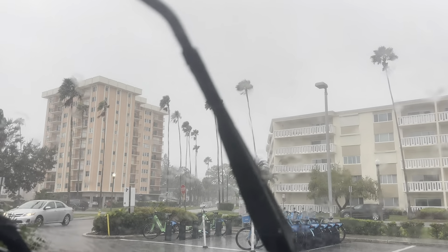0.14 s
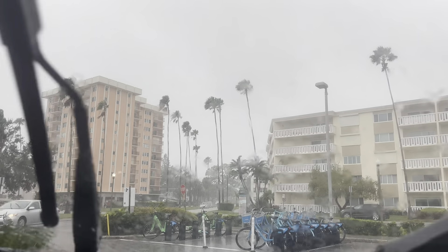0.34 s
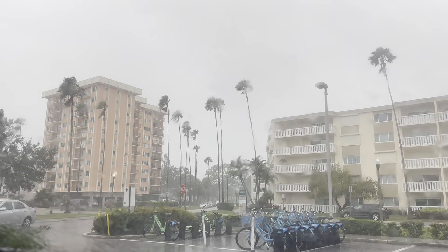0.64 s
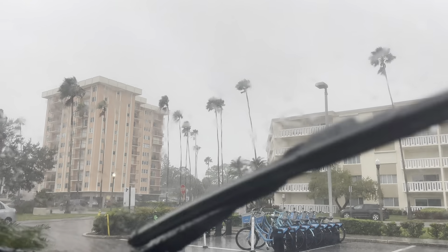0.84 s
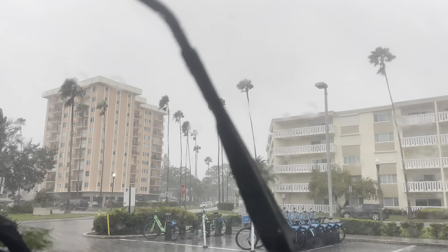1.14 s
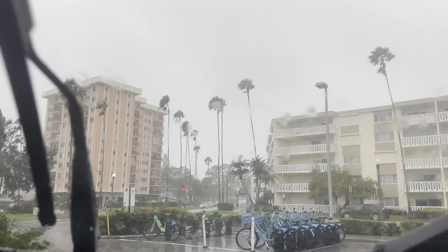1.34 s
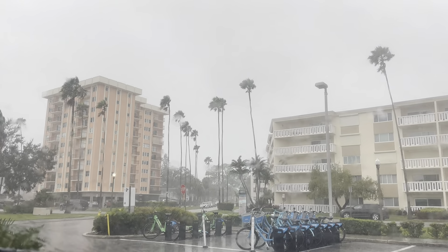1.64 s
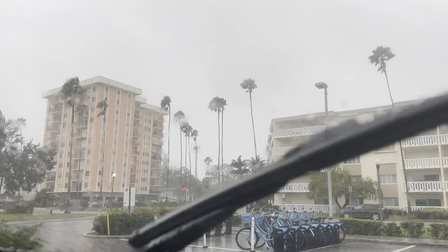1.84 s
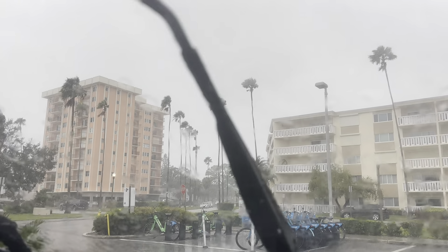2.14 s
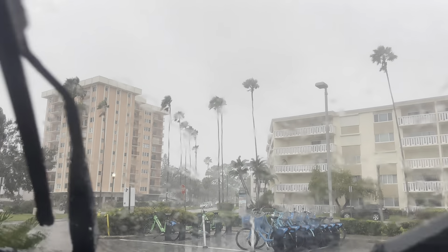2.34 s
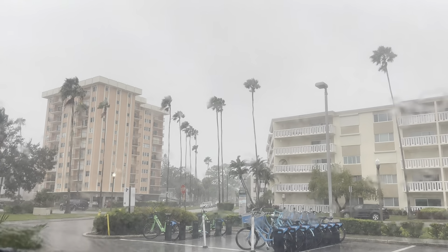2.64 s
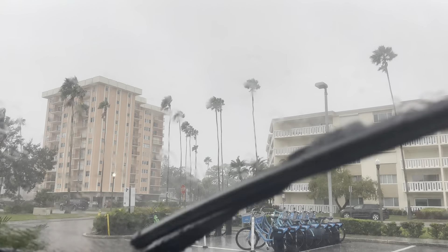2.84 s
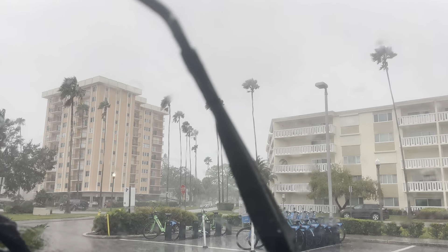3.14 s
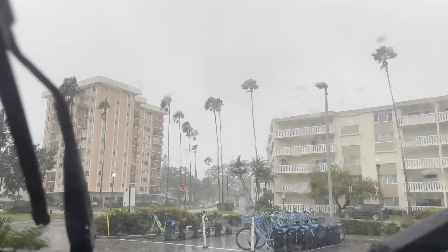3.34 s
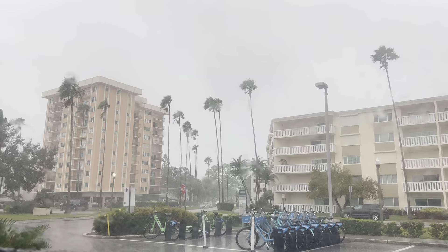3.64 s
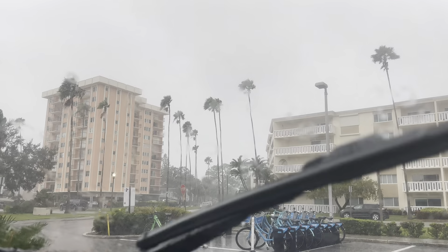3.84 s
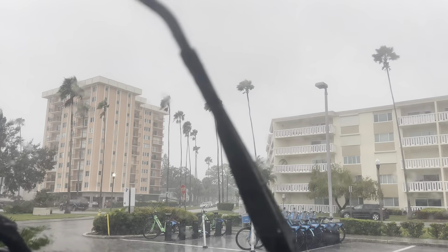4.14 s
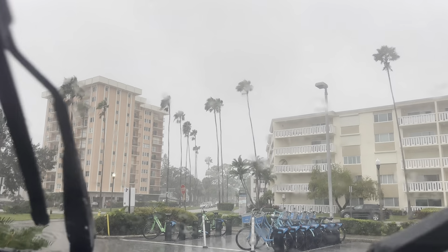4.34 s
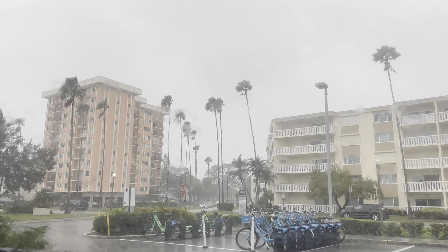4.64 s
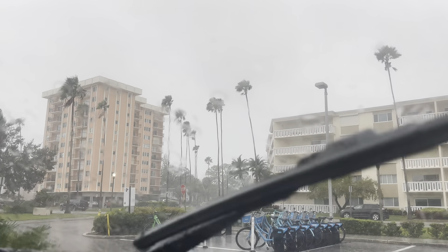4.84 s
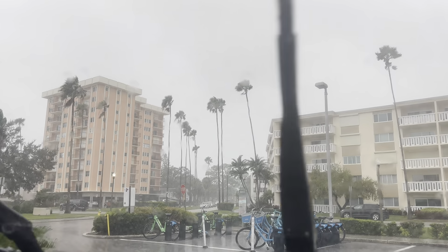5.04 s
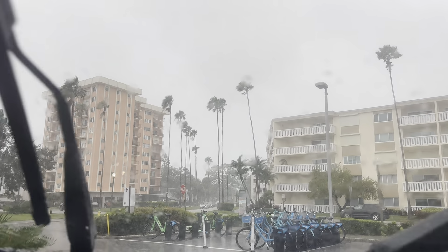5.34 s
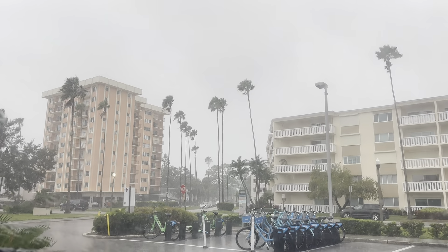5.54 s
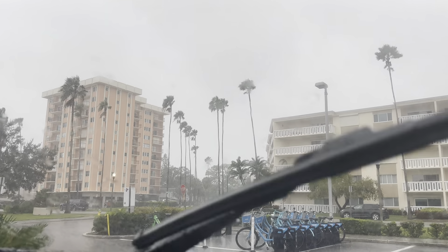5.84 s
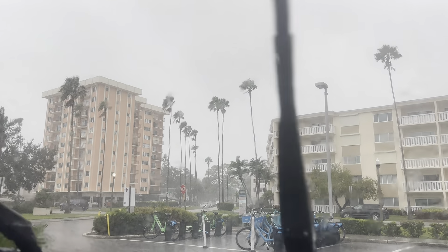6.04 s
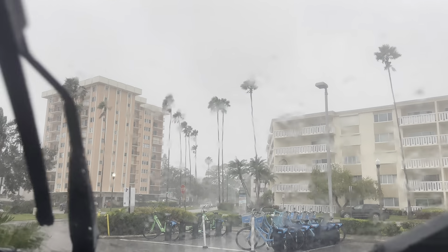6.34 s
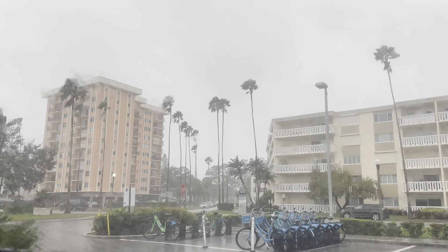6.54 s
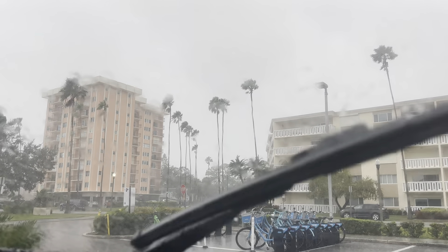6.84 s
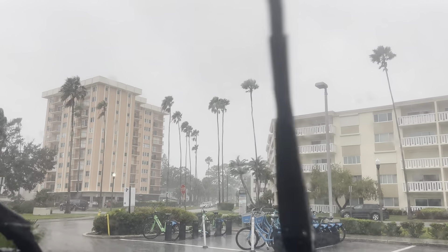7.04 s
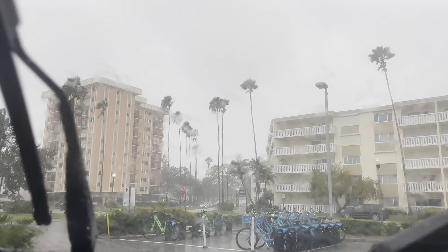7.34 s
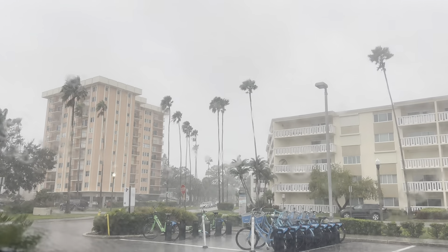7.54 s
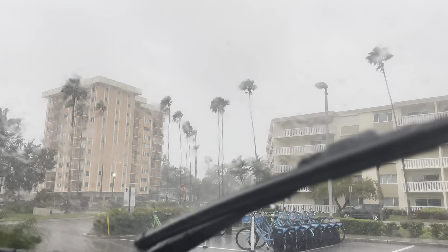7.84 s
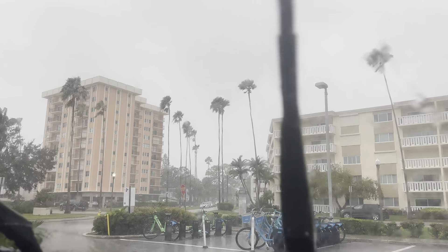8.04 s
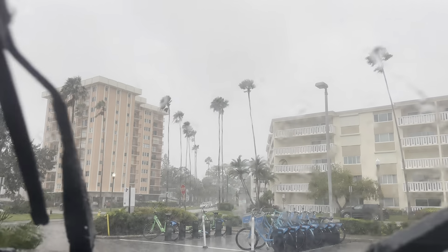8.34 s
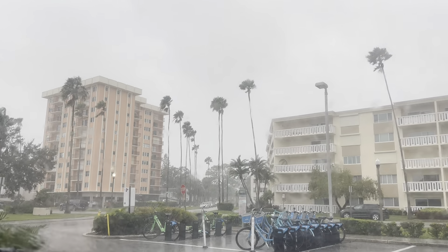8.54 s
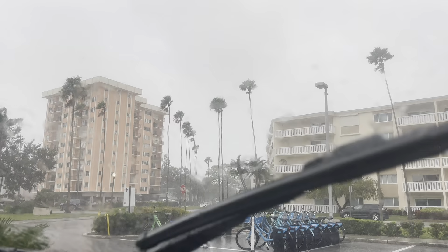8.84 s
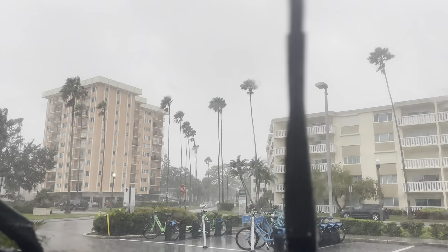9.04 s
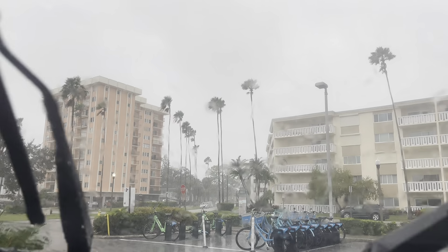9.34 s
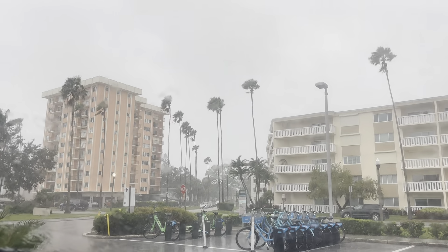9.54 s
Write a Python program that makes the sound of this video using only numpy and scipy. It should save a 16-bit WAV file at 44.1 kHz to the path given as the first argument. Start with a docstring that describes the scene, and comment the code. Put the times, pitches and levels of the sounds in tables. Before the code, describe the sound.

Windscreen wipers thump and judder about once a second inside a parked car while gusty rain hisses on roof and glass over a low body rumble.

```python
"""Windscreen wipers knock at each turn of their sweep, about once a second there and back, in a parked car in a storm.
Each knock rings the low modes of the car body; juddering blades add quick runs of small knocks.
Filtered noise keeps the body rumbling throughout, with a wavering low boom strongest at the turns and a few rough scrapes.
Gusts drive rain on roof and glass: a grainy hiss made of noise splashes, with a few big drops ticking out of it.
A phone near the windscreen hears it all through a left and a right port."""
import sys
import numpy as np
from scipy import signal
from scipy.fft import rfft, irfft, next_fast_len
from scipy.io import wavfile
from scipy.ndimage import uniform_filter1d, minimum_filter1d

SR = 44100
rng = np.random.default_rng(int(sys.argv[2]) if len(sys.argv) > 2 else 0)


def dump(signal):
    """Clip the signal to [-1, 1] and save it as 16-bit WAV at the path in sys.argv[1]."""
    limited = np.clip(np.atleast_2d(signal).T, -1, 1)
    pcm = np.round(limited * 32767).astype(np.int16)
    wavfile.write(sys.argv[1], SR, pcm)


N = 427329
SIZE = next_fast_len(N)  # transform length [samples]
HZ = np.maximum(np.arange(SIZE // 2 + 1) * SR / SIZE, 1)  # pitch of each bin; at least 1 for the logarithm
SWEEP_S, HARD_TURN_S = 1.0005, 0.924  # one sweep there and back; time of the first whole hard turn

# ways the car body rings: (pitch [Hz], relative knock level [dB], relative rumble level [dB],
# time to fade by 60 dB [s], relative judder level [dB])
BODY_MODES = [(59.47, -13.5, -10, 0.13, -22), (99.04, -8.5, 2.5, 0.22, -18.5),
              (122.45, -6.5, -1.5, 0.19, -9), (167.8, -0.5, -15.5, 0.14, -3.5), (199.2, -4, -9.5, 0.11, -9),
              (235.2, -5.5, -10.5, 0.083, -8), (284.4, -9, -24, 0.078, -10.5), (349.5, -2, -24, 0.063, -3),
              (384, 1.5, -25, 0.15, -3), (440.5, -3.5, -27, 0.055, -6), (510, 0.5, -29.5, .03, -10)]


def undb(db):
    """Turn a level in dB into a gain."""
    return 10 ** (np.asarray(db) / 20)


def unit(x):
    """Scale a sound to rms 1."""
    return x / np.sqrt(np.mean(x ** 2))


def in_time(table):
    """Draw each column of a table as a curve over time, sample by sample."""
    s, *columns = np.transpose(table)
    return [np.interp(np.arange(N) / SR, s, column) for column in columns]


def each_sweep(table):
    """Draw each column as a curve that repeats with the wipers."""
    s, *columns = np.transpose(table)
    since_turn = np.arange(N) / SR - HARD_TURN_S
    return [np.interp(since_turn, s, column, period=SWEEP_S) for column in columns]


def in_pitch(table):
    """Draw each column as a curve over pitch, bin by bin."""
    hz, *columns = np.transpose(table)
    return [np.interp(np.log(HZ), np.log(hz), column) for column in columns]


def colour(x, gain):
    """Filter a sound by a complex gain for each bin."""
    return irfft(rfft(x, SIZE) * gain, SIZE)[:N]


def ring(x, hz, t60):
    """Let one mode ring at hz whenever x pushes it, fading by 60 dB in t60 seconds."""
    pole = np.exp(2j * np.pi * hz / SR - np.log(1000) / (t60 * SR))
    return signal.lfilter([1], [1, -pole], x).imag


def spikes(s, size):
    """Place single-sample pushes at the given times."""
    out = np.zeros(N)
    at = np.clip((s * SR).astype(int), 0, N - 1)
    np.add.at(out, at, size)
    return out


def walk(rate):
    """Wander at random: levels held 1 / rate seconds, smoothed twice, with rms 1."""
    hold = int(SR / rate)
    steps = np.repeat(rng.standard_normal(N // hold + 1), hold)
    smooth = uniform_filter1d(uniform_filter1d(steps, hold), hold)
    return unit(smooth[:N])


def patter(per_s=900, spread_db=3.5, wash_db=1.5, biggest_db=20, decay_s=0.002):
    """Dense drops of uneven size splash as short noise bursts over the smooth wash of the distant ones."""
    at, size = rng.random((30000, 2)).T
    heard = np.arange(len(at)) < per_s * N / SR
    size_db = np.minimum(-spread_db * np.log(size), biggest_db)
    hits = spikes(at * N / SR, heard * undb(size_db))
    envelope = signal.lfilter([1], [1, -np.exp(-1 / (decay_s * SR))], hits)
    splash = envelope * rng.standard_normal(N)
    return unit(splash) + undb(wash_db) * rng.standard_normal(N)


def gusty(sheets, drum_share=0.91, treble_share=1.05):
    """Half-octave bands follow the gust; flurries of drops flicker through all of them, the treble most."""
    # rain driven by gusts: (time [s], relative level [dB])
    gust_levels = [(0.06, -48), (0.12, -54), (0.27, -55.5), (0.41, -54.5), (0.45, -50), (0.68, -47.5),
                   (0.79, -48), (1.12, -54.5), (1.33, -59.5), (1.5, -55), (1.64, -55), (1.84, -53),
                   (1.9, -48.5), (2.12, -46.5), (2.3, -47.5), (2.38, -49), (3.15, -53), (3.9, -54),
                   (4.37, -56), (4.45, -52), (4.85, -53), (4.95, -53.5), (5.45, -56.5), (5.65, -54),
                   (5.93, -49), (6.3, -50.5), (6.41, -48), (6.5, -50.5), (6.75, -51), (6.83, -56),
                   (6.99, -54), (7.05, -51.5), (7.17, -53), (7.37, -49), (7.79, -50), (7.85, -52.5),
                   (8.41, -54), (8.5, -52), (8.73, -50), (8.79, -52.5), (9.25, -52), (9.45, -49.5),
                   (9.63, -52.5)]
    level_db, = in_time(gust_levels)
    swing_db = level_db - level_db.mean()
    spectra = rfft(sheets, SIZE)
    flurry = walk(35)
    out = 0
    for octave in np.arange(0, 6.5, .5):  # octaves above 250 Hz
        band = np.clip(1 - 2 * np.abs(np.log2(HZ / 250) - octave), 0, 1)
        low = np.clip(3.5 - octave, 0, 1)  # drumming, fading out from 1.4 to 2.8 kHz
        high = np.clip(octave - 4.0, 0, 1)  # treble, coming in from 4 to 8 kHz
        extra_share = low * (drum_share - 1) + high * (treble_share - 1)
        flicker_db = (.8 - .5 * low) * flurry + 1.12 * walk(12)
        db = level_db + extra_share * swing_db + flicker_db
        out = out + undb(db) * irfft(spectra * band, SIZE)[:, :N]
    return out


def rain():
    """Both ports share one part of the rain, shifted in phase; the right has its own part besides."""
    # tone of the rain: (pitch [Hz], relative left level [dB], relative right level [dB])
    rain_tone = [(251, 4, 2.5), (547, 1.75, -0.5), (788, 3.5, 1), (912, -10, -6), (1130, -3.5, -0.5),
                 (1215, -1, 4), (1308, 2.5, 5.5), (1412, 0, 3), (1590, -0.5, -0.5), (2190, -15.5, -15.5),
                 (2480, -9.5, -8), (2790, -13, -15.5), (3360, -11.5, -16.5), (3820, -15.5, -19.5),
                 (4180, -14, -19), (4730, -14.5, -18), (5550, -20, -21), (6600, -22, -23),
                 (7440, -19.5, -22.5), (7900, -28, -25.5), (8100, -26.5, -19.5), (8430, -37, -27.5),
                 (9650, -35, -30.5), (10400, -39.5, -39), (10600, -48, -42.5), (12300, -50, -55.5),
                 (15700, -47.5, -54.5)]
    # how alike the ports hear it: (pitch [Hz], likeness [0-1], phase of the right [rad])
    port_likeness = [(400, .6, 1.8), (1300, .65, 1.3), (1500, .75, 3.1), (1800, .55, 4.6), (2300, .55, 7.5),
                     (2500, .7, 6.7), (2950, .05, 6), (3550, .6, 6), (3950, .1, 5.5), (4300, .3, 8),
                     (5200, .3, 11.5), (6000, .5, 12.8), (6500, .15, 11.5), (8000, .4, 7.9), (8500, .05, 6),
                     (10500, .8, 9.4)]
    shared, own = gusty(np.array([unit(patter()), unit(patter())]))
    left_db, right_db = in_pitch(rain_tone)
    alike, phase = in_pitch(port_likeness)
    alike = np.clip(alike, 0, 1)
    right = colour(shared, alike * np.exp(1j * phase)) + colour(own, np.sqrt(1 - alike ** 2))
    return undb(24) * np.array([colour(shared, undb(left_db)), colour(right, undb(right_db))])


def drops(late_s=0.0007, tick_s=0.002):
    """Each big drop gives a short noise tick, some duller, and a brief ring of the pane, louder on the left."""
    # big single drops on the glass: (time [s], relative peak level [dB], tick fades above [Hz])
    big_drops = [(0.7794, -31.5, 8500), (1.3844, -39, 6500), (1.4117, -46, 3500), (1.4297, -41, 4000),
                 (2.5373, -34, 7500), (3.4332, -40.5, 3000), (5.2974, -41, 4500), (6.399, -40, 5000),
                 (6.8099, -41, 5000), (8.667, -43, 4500)]
    # the pane under a drop, lower tones later:
    # (pitch [Hz], level against the tick [dB], time to fade by 60 dB [s], delay [s])
    pane_modes = [(1290, -4.5, .04, 0.00301), (2460, -6.5, 0.011, .0015), (5900, -6.5, 0.01, .0005)]
    length = 400  # samples in a tick
    ticks = np.zeros(N + length)
    fade = np.exp(-np.arange(length) / SR / tick_s)
    glass = signal.butter(3, 2200, "high", fs=SR, output="sos")
    for (s, db, dull_hz), burst in zip(big_drops, rng.standard_normal((len(big_drops), length))):
        dull = signal.butter(4, dull_hz, fs=SR, output="sos")
        tick = signal.sosfilt(np.vstack([glass, dull]), burst * fade)
        at = int((s + late_s) * SR)
        ticks[at:at + length] += undb(db) * tick / np.abs(tick).max()
    s, peak_db, _ = np.transpose(big_drops)
    pane = 0
    for hz, db, t60, delay in pane_modes:
        pane = pane + ring(spikes(s + late_s + delay, undb(peak_db + db)), hz, t60)
    return undb([[1.5], [-.5]]) * (ticks[:N] + pane)  # left, right


def scrapes(low_hz=710, high_hz=810, rough_db=1.5):
    """A narrow band of rough noise, a rasp, swells and fades."""
    # brief mid-range rasps: (middle [s], length [s], level [dB])
    rasps = [(3.98, .04, -42), (4.535, .03, -42), (4.797, .035, -41.5), (8.87, 0.047, -44)]
    t = np.arange(N) / SR
    swell = sum(undb(db) * np.exp(-((t - s) / (length / 2)) ** 2) for s, length, db in rasps)
    rough = rng.standard_normal((2, N)) * undb(rough_db * walk(90))
    narrow = signal.butter(2, [low_hz, high_hz], "band", fs=SR, output="sos")
    return swell * unit(signal.sosfilt(narrow, rough))


def rumble():
    """Unsteady shaking keeps the body modes sounding; the lowest is a wavering boom that repeats each sweep."""
    # the boom through every sweep: (time after the hard turn [s], relative level [dB])
    boom_levels = [(.025, -21.5), (.09, -22), (.17, -36), (.26, -35), (.36, -42), (.5, -35), (.63, -23),
                   (.7, -27.5), (.78, -38), (.9, -33), (.975, -31.5)]
    # wind and wipers shaking the body: (time [s], relative rumble level [dB])
    shaking_levels = [(0.0, -17), (0.08, -26), (0.21, -20.5), (0.24, -31), (0.51, -25.5), (0.57, -18.5),
                      (0.78, -29), (0.89, -20.5), (1.53, -31), (1.59, -24.5), (1.81, -30.5), (1.86, -20),
                      (2.75, -26.5), (2.89, -20.5), (3.13, -25), (3.21, -19.5), (3.4, -34.5), (3.45, -17.5),
                      (3.48, -28.5), (3.56, -19), (3.7, -31.5), (3.91, -20.5), (4.32, -30), (4.53, -18.5),
                      (4.56, -27), (4.75, -22.5), (5.48, -28), (5.56, -17.5), (5.61, -29.5), (6.07, -21),
                      (6.31, -28.5), (6.61, -21), (6.67, -38), (6.72, -26), (7.04, -21.5), (7.1, -30),
                      (7.26, -23.5), (7.5, -26), (7.55, -18), (7.72, -29), (7.96, -22), (8.36, -31.5),
                      (8.45, -20.5), (8.47, -32.5), (8.53, -24), (8.83, -28), (8.85, -17.5), (8.93, -31),
                      (8.98, -22), (9.17, -33.5), (9.23, -16.5), (9.28, -36), (9.31, -22.5), (9.45, -31.5),
                      (9.55, -19), (9.69, -27)]
    boom_db, = each_sweep(boom_levels)
    shaking_db, = in_time(shaking_levels)
    flutter_db = 1.3 * walk(22)  # felt by all modes together
    modes = 0
    for hz, _, db, t60, _ in BODY_MODES[1:]:
        push = rng.standard_normal(N) * undb(flutter_db + 1.75 * walk(25))
        modes = modes + unit(ring(push, hz, t60)) * undb(db)
    boom_hz = BODY_MODES[0][0] * (1 + 0.0613 * walk(7))
    boom = np.sin(2 * np.pi * np.cumsum(boom_hz) / SR)
    weakness = np.clip((boom_db.max() - boom_db) / 12, 0, 1)
    waver_db = 3.5 * weakness * walk(14)  # the weaker, the less steady
    return undb(shaking_db) * unit(modes) + undb(boom_db + waver_db) * boom


def knocks(late_cycles=0.718, early_s=0.00502, scatter_db=2.03, upper_hz=310, judder_per_s=140,
           sag_db=-5, slip_db=-6, judder_upper_db=-13):
    """Each knock rings all modes a little differently, the low ones later through the bending panels;
    the judder of a turn is a quick run of small knocks that weakens toward its end."""
    # the loudest wiper knocks: (time [s], relative peak level [dB], upper modes against lower [dB])
    loud_knocks = [(0.136, -19, -12), (0.176, -17.5, -21.5), (0.387, -19, -14.5), (0.501, -14.5, -13.5),
                   (0.555, -11, -19), (0.582, -8, -28.5), (0.77, -19, -15), (0.848, -28.5, -20),
                   (0.923, -5.5, -11.5), (0.954, -12, -11), (1.016, -9, -16.5), (1.18, -19.5, -29),
                   (1.499, -24.5, -18), (1.567, -17, -17), (1.589, -13, -14.5), (1.725, -22.5, -23),
                   (1.866, -13.5, -19), (1.93, -6.5, -17), (1.971, -12.5, -30), (2.137, -14.5, -12.5),
                   (2.178, -14.5, -18), (2.391, -16, -27), (2.425, -14.5, -22), (2.501, -20, -21),
                   (2.558, -12.5, -31), (2.904, -13.5, -12), (2.929, -8.5, -9.5), (2.959, -13.5, -12.5),
                   (3.029, -13, -27.5), (3.051, -14, -17), (3.177, -15, -45), (3.431, -11.5, -13.5),
                   (3.538, -9, -17), (3.565, -15.5, -14), (3.598, -12, -9.5), (3.885, -14, -18),
                   (3.946, -12.5, -14.5), (3.968, -7.5, -18.5), (3.997, -13, -20), (4.056, -14.5, -18.5),
                   (4.252, -22.5, -21.5), (4.395, -13.5, -11.5), (4.506, -10.5, -11), (4.564, -15, -12),
                   (4.599, -12.5, -21), (4.639, -20, -29.5), (4.843, -19, -18.5), (4.931, -6.5, -9.5),
                   (4.962, -10, -12.5), (5.024, -12.5, -22), (5.185, -16.5, -15), (5.54, -11.5, -13),
                   (5.565, -13, -10.5), (5.599, -12, -14.5), (5.677, -21.5, -22.5), (5.936, -5.5, -11),
                   (5.966, -14.5, -10), (5.996, -17, -13.5), (6.022, -12, -16.5), (6.053, -16, -18),
                   (6.206, -21.5, -18.5), (6.5, -11.5, -15.5), (6.562, -8.5, -10.5), (6.595, -15.5, -7),
                   (6.936, -7.5, -10.5), (6.966, -14.5, -5.5), (6.996, -13.5, -15.5), (7.018, -11.5, -27),
                   (7.393, -16, -8.5), (7.511, -15, -17), (7.54, -16, -18.5), (7.558, -15, -9.5),
                   (7.591, -17, -11), (7.936, -7, -9.5), (7.967, -10.5, -12), (7.997, -15, -13),
                   (8.025, -13.5, -16.5), (8.058, -17, -13), (8.425, -15.5, -20), (8.507, -18, -13),
                   (8.593, -13, -24), (8.877, -13.5, -17), (8.941, -8.5, -12), (8.971, -11, -8),
                   (8.999, -16, -22), (9.518, -10, -12.5), (9.642, -17, -28)]
    # the blades judder while they turn, hard and soft turns by turns:
    # (start [s], length [s], relative level [dB])
    judder_turns = [(-0.06, .11, -7.5), (0.534, .11, -9), (0.908, .12, -11), (1.566, 0.051, -14),
                    (1.868, .17, -7.5), (2.549, 0.076, -6), (2.905, 0.15, -9), (3.55, .13, -16.5),
                    (3.919, 0.11, -9), (4.505, .16, -15), (4.939, 0.11, -14), (5.52, 0.1, -15),
                    (5.929, .14, -8.5), (6.565, 0.05, -10.5), (6.921, .13, -10), (7.496, .15, -11),
                    (7.937, 0.12, -16), (8.514, 0.14, -16.5), (8.924, 0.11, -10), (9.505, 0.13, -12)]
    # faint knocks at random moments: how many, relative level, its spread, upper modes against lower
    small_count, small_db = 30, -29
    small_spread_db, small_upper_db = 1, -23
    small = [(at * N / SR, small_db - small_spread_db * np.log(size), small_upper_db)
             for at, size in rng.random((small_count, 2))]
    s, peak_db, upper_db = np.transpose(np.vstack([loud_knocks, small]))
    start, length, turn_db = np.transpose(judder_turns)
    chance = rng.standard_normal((len(s), len(BODY_MODES)))
    # uneven slips of the blades, heard only during a turn
    slips = np.cumsum((.4 + 1.2 * rng.random(3000)) / judder_per_s)
    slips = slips[slips < N / SR]
    slip_chance = rng.standard_normal((3000, len(BODY_MODES)))[:len(slips)]
    done = (slips[:, None] - start) / length  # share of each turn gone by
    turning = (done > 0) * (done < 1) * undb(slip_db + sag_db * np.clip(done, 0, 1))
    out = 0
    for k, (hz, db, _, t60, judder_db) in enumerate(BODY_MODES):
        upper = hz > upper_hz
        knock_db = peak_db + upper * upper_db + db + scatter_db * chance[:, k]
        # neighbouring modes are pushed in opposite directions
        push = spikes(s - early_s + late_cycles / hz, (-1) ** k * undb(knock_db))
        slip_gain = turning @ undb(turn_db + upper * judder_upper_db + judder_db)
        judder = spikes(slips, slip_gain * slip_chance[:, k])
        out = out + ring(push + judder, hz, t60)
    return undb(-5.0) * out


def scene():
    """Body sound is muffled above the panel modes and reaches the left port far more strongly than the right."""
    # right port against left for body sound: (pitch [Hz], gain [dB], phase [rad])
    right_port = [(25, -2, 0), (60, -4.3, -.6), (110, -9, -.75), (170, -12, -.67), (260, -13, -.4),
                  (320, -20, .4), (385, -16, 1.9), (500, -12, 1.8)]
    muffle = 1 / (1 + (HZ / 480) ** 12)
    body = undb(6.0) * colour(knocks() + rumble(), muffle)
    gain_db, phase = in_pitch(right_port)
    body_right = colour(body, undb(gain_db) * np.exp(1j * phase))
    return np.array([body, body_right]) + rain() + drops() + scrapes()


def steep(hz, kind, x):
    """Cut sharply above (low) or below (high) a pitch: 0.2 dB ripple, 70 dB cut."""
    return signal.sosfilt(signal.ellip(8, .2, 70, hz, kind, fs=SR, output="sos"), x)


def record(dry):
    """The phone cuts the deepest bass, smoothly limits the loudest peaks, weakens the treble above 12.3 kHz
    a little and cuts it above 15.7 kHz; a gap is cut between the roll-off and 12.3 kHz."""
    low_hz, roll_off_hz = 39.7, 10718
    # a band of top treble that passes above the roll-off: from, up to, level
    air_hz, top_hz, air_db = 12300, 15700, -7
    x = signal.sosfilt(signal.butter(6, low_hz, "high", fs=SR, output="sos"), dry)
    peak = np.abs(x).max(axis=0)
    headroom = np.minimum(1, .9 / np.maximum(peak, 1e-6))
    x = x * uniform_filter1d(minimum_filter1d(headroom, size=600), size=600)
    air = undb(air_db) * steep(air_hz, "high", x)
    return steep(top_hz, "low", steep(roll_off_hz, "low", x) + air)


dry = scene()
out = record(dry)
dump(out)
```